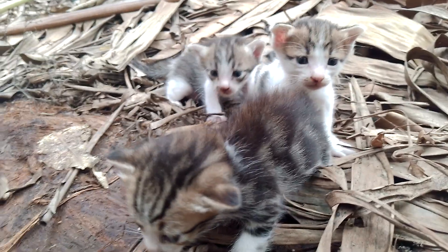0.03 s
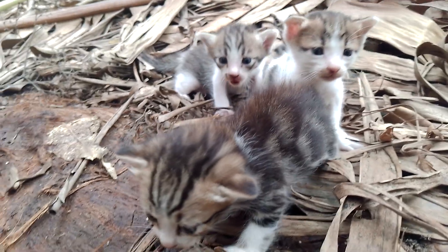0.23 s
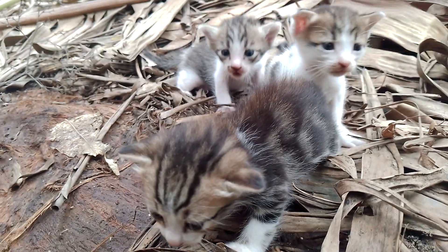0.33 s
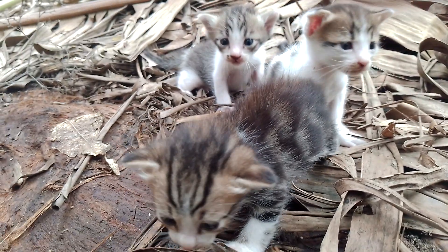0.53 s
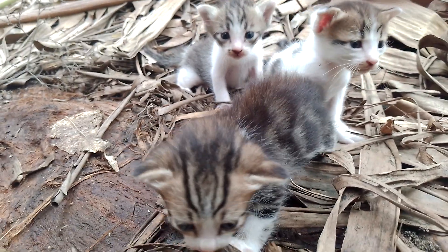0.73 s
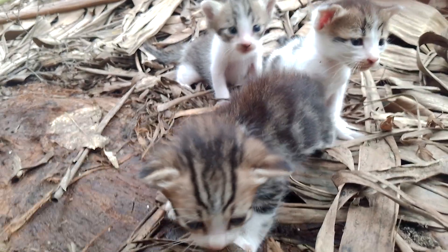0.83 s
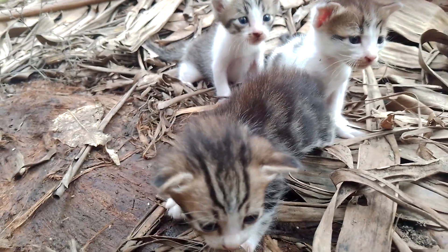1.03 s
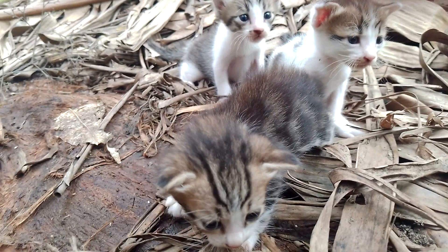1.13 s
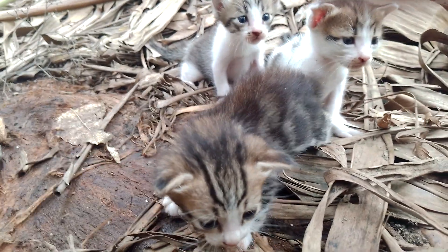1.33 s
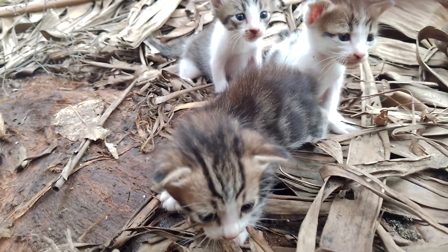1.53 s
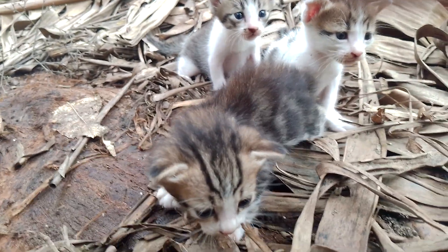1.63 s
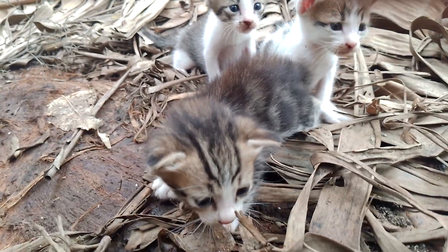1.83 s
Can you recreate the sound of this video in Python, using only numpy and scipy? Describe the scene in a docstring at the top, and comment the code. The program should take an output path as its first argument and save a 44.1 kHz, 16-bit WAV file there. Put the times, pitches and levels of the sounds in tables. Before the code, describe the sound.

A kitten hisses briefly after a few crisp crackles of dry leaves, close up outdoors.

```python
"""Light paw ticks and short runs of snaps from brittle leaves, outdoors, close to the microphone.
Kittens are shifting about on dry litter: each snap is a spray of breaking fibres that sets a leaf
ringing or quivering, twigs knock and fur brushes past. Then one kitten gives a thin hiss of half a
second, air rushing and whistling through its narrowing mouth. Behind it all lies very quiet air with
a few faint chirps far off."""
import sys
import numpy as np
from scipy import signal
from scipy.fft import rfft, irfft
from scipy.io import wavfile

SR = 44100
rng = np.random.default_rng(int(sys.argv[2]) if len(sys.argv) > 2 else 0)


def put_to_file(sound):
    """Save the sound as 16-bit audio at rate SR, in the file named by the first command-line argument."""
    columns = np.atleast_2d(sound).T  # one column per channel
    safe = np.clip(columns, -1, 1)
    whole_steps = np.round(safe * 32767)
    wavfile.write(sys.argv[1], SR, whole_steps.astype(np.int16))


N = 83790
TIME = np.arange(N) / SR

# Leaves snapping by the microphone. Each row: start in seconds, strength in dB, decay in seconds, leaf.
LEAF_SNAPS = [(0.2444, 0.5, 0.00015, "papery"), (0.2546, 0, 0.0015, "papery"), (.258, 1, 0.0013, "papery"),
              (0.2449, -11, 0.0037, "crisp"), (0.2493, -1.5, 0.0038, "crisp"),
              (.2526, 0.5, 0.00098, "crisp"), (0.2569, 1.5, 0.0015, "crisp"),
              (0.38, 6.5, 0.0022, "ringing"), (0.383, 3.5, 0.0012, "ringing"),
              (0.6188, -1.5, 0.0041, "hollow"), (0.6203, -0.5, 0.0034, "hollow"),
              (0.6231, 1.5, 0.0017, "hollow"), (0.6259, 0, 0.0028, "hollow"), (.9848, -3, 0.001, "stiff"),
              (0.9878, -1, 0.01, "stiff"), (0.9958, -10, 0.0011, "stiff"), (0.9976, -7.5, 0.0065, "stiff"),
              (0.584, -17, 0.00099, "small"), (1.025, -25, 0.0028, "small"), (1.056, -8, 0.00092, "small"),
              (1.0607, -13, 0.00081, "small")]
# How a snap builds up. Each entry: leaf, rise time in seconds.
SNAP_RISE_S = {"papery": .0001, "crisp": .0001, "ringing": 0.00021, "hollow": 0.00018, "stiff": 0.000088,
               "small": 0.00069}
# The colour of each leaf. Each row: frequency in Hz, relative level in dB.
LEAF_COLOURS = {"papery": [(30, -28.5), (250, -19), (800, -23.5), (2100, -17), (3700, -20), (5300, -14),
                (6400, -18), (9000, -13), (11000, -6), (14000, -8), (16000, -2)], "crisp": [(1500, -30.5),
                (6000, -19), (7600, -4), (9000, -1), (10800, -8.5), (13000, -5), (16000, -1)],
                "ringing": [(300, -62), (624, -55.5), (1870, -32), (2360, -41.5), (3400, -19.5),
                (5080, -33.5), (6620, -13.5), (7200, -26), (7690, -4), (9240, 6.5), (10200, -21),
                (14000, -17), (16000, -21)], "hollow": [(120, -58.5), (270, -26.5), (480, -11.5),
                (800, -26), (1300, -19), (1950, -7), (2800, -18.5), (3400, -15), (5200, -29.5),
                (6000, -14.5), (8000, -15.5), (10200, 7.5), (11100, -18.5), (12300, -0.5), (14000, -2),
                (16000, -5.5)], "stiff": [(120, -64), (200, -48.5), (1230, -18), (1810, -14), (2910, -22.5),
                (3370, -17.5), (4770, -18.5), (5230, -31.5), (6760, -5.5), (7410, -9.5), (9060, -9),
                (10700, 2), (13600, -6), (16000, -6)], "small": [(1000, -55), (1800, -34), (3000, -42),
                (3900, -28), (5500, -32), (7800, -23.5), (8600, 3.5), (9600, -12.5), (10800, -0.5),
                (12400, -10), (13200, -12.5), (14500, -12.5), (16000, -20)]}
# The tones each leaf rings with. Each row: pitch in Hz, gain in dB, 60 dB decay time in seconds.
LEAF_RINGS = {"papery": [(14100, -24, .012)], "crisp": [], "ringing": [(3560, -50, .014), (4650, -51, .014),
              (7950, -40, .014), (8500, -40, .014), (9240, -33, .014)], "hollow": [(1970, -39, 0.019),
              (6120, -45, .025), (9300, -48, 0.016), (10300, -45, 0.037)], "stiff": [(1893, -33.5, 0.021),
              (7000, -36, 0.017), (15380, -23, .02)], "small": [(8450, -28, 0.0041)]}
# Each leaf's quiver. Each row: centre in Hz, width in Hz, gain in dB, 60 dB decay time in seconds.
LEAF_QUIVERS = {"papery": [], "crisp": [(8400, 1300, -33, 0.22)], "ringing": [(3560, 200, -49.5, 0.204),
                (7560, 170, -34, 0.15), (8300, 150, -35, 0.13), (8880, 190, -36, .15)],
                "hollow": [(445, 230, -40.5, 0.11), (2500, 1900, -37, 0.081), (5970, 220, -42.5, 0.38),
                (9150, 130, -36, .18), (10000, 450, -27.5, 0.25)], "stiff": [(1804, 85, -38.5, 0.36),
                (7140, 804, -25, 0.34)], "small": []}

# Light touches of the paws. Each row: start in seconds, strength in dB, centre in Hz.
PAW_TICKS = [(0.036, -37, 9600), (0.316, -37, 10000), (0.331, -37.5, 8300), (0.4704, -30, 8130),
             (0.513, -38, 10900), (0.575, -35.5, 11900), (0.832, -41, 9400), (0.904, -42.5, 9560),
             (0.94, -36, 8300), (1.045, -34, 10000), (1.184, -31.5, 15240), (1.218, -31.5, 9500),
             (1.801, -34, 9600), (1.848, -37, 10000)]
TICK_DECAY_S, TICK_Q = .0012, 9   # Q is centre over bandwidth
CRUMBS_DB, CRUMBS_SPREAD_S = -8.5, .003   # relative to their tick
# Twigs knocking. Each row: start in seconds, strength in dB, centre in Hz, width in Hz, decay in seconds.
TWIG_KNOCKS = [(0.4793, -39.5, 2780, 260, 0.0029), (.482, -44, 1960, 201.3, 0.0016),
               (.576, -45, 2500, 700, 0.0035), (1.19, -39.5, 1061, 598, 0.0018),
               (1.797, -45.5, 757, 510, 0.011), (1.802, -45, 2615, 700, .002),
               (1.861, -44, 2520, 2010, 0.0016)]
SETTLE_PER_S, SETTLE_HZ = 51, 10000
# Fur brushing the litter. Each row: time in seconds, level in dB.
FUR_LEVEL = [(1.0, -54.5), (1.1, -85), (1.14, -69), (1.22, -69), (1.33, -63), (1.4, -108)]
# The colour of that brushing. Each row: frequency in Hz, relative level in dB.
FUR_COLOUR = [(300, -13), (900, -8.5), (1500, -2.5), (2600, -8.5), (5000, -9), (9000, -5)]

# The air flow of the hiss. Each row: time in seconds, level in dB.
BREATH_LEVEL = [(1.2, -88), (1.225, -54.5), (1.25, -47), (1.28, -48), (1.35, -42.5), (1.385, -42.5),
                (1.43, -46), (1.55, -46), (1.6, -47), (1.668, -48), (1.685, -60), (1.71, -86)]
# The colour of the breath. Each row: frequency in Hz, relative level in dB.
BREATH_COLOUR = [(150, -50), (440, -18), (750, -32), (1400, -27), (2100, -18), (2700, -17.5), (3500, -13),
                 (4900, -16.5), (5400, -9.5), (6700, -14.5), (8800, 2.5), (10400, 3), (12000, -32),
                 (16000, -22)]
# The treble on top of the breath. Each row: time in seconds, level in dB.
TREBLE_LEVEL = [(1.2, -121), (1.244, -48), (1.256, -48), (1.292, -55.5), (1.354, -53.5), (1.38, -44),
                (1.426, -51.5), (1.608, -43), (1.666, -42), (1.71, -100)]
# The colour of that treble. Each row: frequency in Hz, relative level in dB.
TREBLE_COLOUR = [(7000, -31), (9800, -29), (11000, 1), (14000, -3.5), (15300, -1.5), (16000, -16)]
# Antiresonances of the mouth. Each row: centre in Hz, width in Hz.
MOUTH_NOTCHES = [(1690, 190), (3970, 63), (5020, 240), (5760, 250)]
# High resonances of the mouth. Each row: nominal pitch in Hz, width in Hz, relative level in dB.
HIGH_WHISTLES = [(7540, 160, -5), (9370, 194, 7), (10960, 130, -4.5), (11380, 110, -8.5)]
# Those resonances sounding as the mouth narrows. Each row: time in seconds, level in dB.
HIGH_WHISTLE_LEVEL = [(1.2, -88.5), (1.25, -58), (1.29, -46.5), (1.35, -64), (1.38, -37), (1.398, -33),
                      (1.43, -43), (1.52, -37.5), (1.56, -48.5), (1.65, -44), (1.70, -96)]
# The lowest mouth resonance. Each row: time in seconds, level in dB.
LOW_WHISTLE_LEVEL = [(1.35, -69), (1.41, -54.5), (1.445, -56.5), (1.52, -52.5), (1.56, -63), (1.59, -53.5),
                     (1.662, -63), (1.69, -69)]
# The resonances rising as the mouth narrows. Each row: time in seconds, share of nominal pitch.
WHISTLE_RISE = [(1.29, 0.9), (1.39, 0.99), (1.52, 1.0), (1.63, 1.012)]
LOW_WHISTLE_HZ, LOW_WHISTLE_WIDTH_HZ = 4418, 230   # nominal pitch
THROAT_HZ, THROAT_WIDTH_HZ, THROAT_DB = 2014, 174, -23   # nominal pitch; level relative to the breath
TREMBLE_SHARE, TREMBLE_HZ = .004, 24.3   # the whistles waver in pitch
FLUTTER_DB, FLUTTER_HZ = .6, 98   # the whole hiss flutters in level
RIPPLE_DB, RIPPLE_SPACING_HZ = 7, 171

# Scatter from the plants around. Each row: frequency in Hz, relative level in dB.
SCATTER_COLOUR = [(150, -3.5), (2000, -5), (4500, -8), (7500, -4), (10000, -7.5), (13000, -2.5),
                  (16000, -1.5)]
SCATTER_DB, SCATTER_T60_S = -25, .2
# Chirps far off. Each row: start in seconds, length in seconds, centre in Hz, top level in dB.
FAR_CHIRPS = [(0.127, 0.078, 7320, -63.5), (0.506, 0.049, 3880, -75), (0.677, 0.061, 7370, -62.5),
              (0.707, 0.1, 7700, -71.5)]
CHIRP_Q = 11
# The still outdoor air. Each row: frequency in Hz, relative level in dB.
AIR_COLOUR = [(25, -15), (50, -14.5), (100, -6), (175, -14.5), (280, -2), (700, -14.5), (2400, -17.5),
              (3100, -12.5), (5300, -15.5), (9000, -3.5), (12000, -9.5), (16000, -6.5)]
AIR_DB = -68.5
CUTOFF_HZ = 15750


def leaves():
    """Right by the microphone, each leaf gives way in a few snaps that leave it ringing or quivering."""
    out = np.zeros(N)
    for name, spectrum in LEAF_COLOURS.items():
        force = np.zeros(N)
        for start, db, decay_s, leaf in LEAF_SNAPS:
            if leaf == name:
                add(force, start, db, fracture(decay_s, SNAP_RISE_S[name]))
        out += colour(force, spectrum)
        out += sum(from_db(db) * ring(force, hz, t60) for hz, db, t60 in LEAF_RINGS[name])
        out += sum(linger(force, band(hz, width), db, t60) for hz, width, db, t60 in LEAF_QUIVERS[name])
    return out


def fracture(decay_s, rise_s, size=2048):
    """A swelling, then dying spray of tiny fibre breaks."""
    t = TIME[:size]
    fade = np.exp(-t / decay_s) * (1 - np.exp(-t / rise_s)) ** 2
    spray = rng.standard_normal(size) * from_db(2.3 * rng.standard_normal(size)) * fade
    for _ in range(2):   # flatten the spectrum while keeping the burst short
        spray = irfft(np.exp(1j * np.angle(rfft(spray * np.sqrt(fade)))))
    return spray * np.exp(-t / (5 * decay_s)) * np.linspace(1, 0, size) ** 2


def paws():
    """Each touch of a paw ticks on the litter and breaks two crumbs around it."""
    out = np.zeros(N)
    for start, db, hz in PAW_TICKS:
        add(out, start, db, resonate(fracture(TICK_DECAY_S, rise_s=.00036), hz, hz / TICK_Q))
        for lag in rng.uniform(-CRUMBS_SPREAD_S, CRUMBS_SPREAD_S, size=2):
            crumb = resonate(fracture(TICK_DECAY_S, rise_s=.0001), hz, hz / 2)
            add(out, start + lag, db + CRUMBS_DB, crumb)
    return out


def hiss():
    """Close up, fluttering air rushes through throat and teeth, and the narrowing mouth whistles."""
    flow = level(BREATH_LEVEL)
    rush = flow * noise(BREATH_COLOUR) + ripple(level(TREBLE_LEVEL) * noise(TREBLE_COLOUR))
    for hz, width in MOUTH_NOTCHES:
        rush -= resonate(rush, hz, width)
    throat = flow * from_db(THROAT_DB) * whistle(THROAT_HZ, THROAT_WIDTH_HZ)
    high_bands = sum(from_db(db) * whistle(hz, width) for hz, width, db in HIGH_WHISTLES)
    high = level(HIGH_WHISTLE_LEVEL) * rms_one(high_bands)
    low = level(LOW_WHISTLE_LEVEL) * whistle(LOW_WHISTLE_HZ, LOW_WHISTLE_WIDTH_HZ)
    flutter = from_db(FLUTTER_DB * wander(FLUTTER_HZ))
    return flutter * (rush + throat + high + low)


def whistle(hz, width_hz):
    """A resonance of mouth or throat: a narrow band of noise that trembles and rises in pitch."""
    rise = np.interp(TIME, *np.transpose(WHISTLE_RISE))
    tremble = 1 + TREMBLE_SHARE * wander(TREMBLE_HZ)
    phase = 2 * np.pi * np.cumsum(hz * rise * tremble) / SR
    return rms_one(sum(wander(width_hz / 2) * wave(phase) for wave in (np.cos, np.sin)))


def ripple(x):
    """Small irregular resonances put steady peaks and dips into the spectrum."""
    hz = np.fft.rfftfreq(N, 1 / SR)
    bumps = np.interp(hz / RIPPLE_SPACING_HZ, np.arange(N), rng.uniform(-1, 1.01, N))
    return irfft(rfft(x) * from_db(RIPPLE_DB * bumps), N)


def twigs():
    """Twigs knock together, each knock a short burst through one resonance."""
    out = np.zeros(N)
    for start, db, hz, width, decay_s in TWIG_KNOCKS:
        add(out, start, db, resonate(fracture(decay_s, rise_s=.00019), hz, width))
    return out


def fur():
    """Fur slides over the litter in soft swells of noise."""
    return level(FUR_LEVEL) * noise(FUR_COLOUR)


def settling():
    """The litter keeps settling with tiny, high ticks at random moments."""
    slips = rng.random(N) < SETTLE_PER_S / SR
    strength = from_db(-39.5 + 1.4 * np.minimum(rng.exponential(1, N), 3))
    return resonate(slips * strength, SETTLE_HZ, SETTLE_HZ / TICK_Q)


def plant_scatter(x):
    """The plants around throw a weak, short tail back to the microphone."""
    return linger(x, noise(SCATTER_COLOUR), SCATTER_DB, SCATTER_T60_S)


def far_chirps():
    """Far from the microphone, blurred chirps: each one a swell of narrow noise."""
    out = np.zeros(N)
    for start, length, hz, db in FAR_CHIRPS:
        swell = np.sin(np.pi * np.clip((TIME - start) / length, 0, 1))
        out += from_db(db) * swell * band(hz, hz / CHIRP_Q)
    return out


def still_air():
    """The quiet of the place: a faint, steady bed of noise."""
    return from_db(AIR_DB) * noise(AIR_COLOUR)


def from_db(db):
    """Decibels to gain."""
    return 10 ** (np.asarray(db) / 20)


def rms_one(x):
    """Scale to unit rms."""
    return x / np.sqrt(np.mean(x ** 2) + 1e-20)


def level(rows):
    """Gain from a curve of seconds and dB, silent outside it."""
    return from_db(np.interp(TIME, *np.transpose(rows), left=-150, right=-150))


def add(track, start_s, db, burst):
    """Lay a burst into a track with its energy set in dB."""
    i = int(start_s * SR)
    track[i:i + len(burst)] += (from_db(db) * burst / np.linalg.norm(burst))[:N - i]


def colour(x, points, size=4096):
    """Causal filter of unit energy, shaped by points of Hz and dB."""
    hz, db = np.transpose(points)
    grid = np.maximum(np.fft.rfftfreq(size, 1 / SR), 1)
    gain = from_db(np.interp(np.log(grid), np.log(hz), db))
    cepstrum = irfft(np.log(gain))
    cepstrum[1:size // 2] *= 2   # fold to minimum phase
    cepstrum[size // 2 + 1:] = 0
    response = irfft(np.exp(rfft(cepstrum)))
    return signal.fftconvolve(x, response / np.linalg.norm(response))[:N]


def resonate(x, hz, width_hz):
    """Two-pole resonance, gain 1 at its peak."""
    r = np.exp(-np.pi * width_hz / SR)
    feedback = [1, -2 * r * np.cos(2 * np.pi * hz / SR), r * r]
    return signal.lfilter(np.array([1, 0, -1]) * (1 - r * r) / 2, feedback, x)


def ring(x, hz, t60):
    """A unit click sets a tone of height 1 ringing."""
    r = from_db(-60 / (t60 * SR))
    feedback = [1, -2 * r * np.cos(2 * np.pi * hz / SR), r * r]
    return signal.lfilter([.5, 0, -.5], feedback, x + 1e-18)


def linger(x, tail_noise, db, t60):
    """Smear a sound into a dying tail of the given noise."""
    tail = tail_noise * from_db(-60 * TIME / t60)
    return from_db(db) * signal.fftconvolve(x, tail / np.linalg.norm(tail))[:N]


def noise(points):
    """Coloured noise of unit rms."""
    return rms_one(colour(rng.standard_normal(N), points))


def band(hz, width_hz):
    """Noise in one steep-sided resonance, unit rms."""
    return rms_one(resonate(resonate(rng.standard_normal(N), hz, width_hz), hz, 4 * width_hz))


def wander(hz):
    """Random drift of unit rms, mostly slower than the given rate."""
    return rms_one(signal.sosfilt(signal.butter(2, hz, fs=SR, output="sos"), rng.standard_normal(N)))


def scene():
    """One microphone close to the kittens on the litter, with plants around and chirps far off."""
    litter = leaves() + paws() + twigs() + settling() + fur()
    return (litter + plant_scatter(litter) + hiss() + far_chirps() + still_air())[None]


def record(dry):
    """A steep low-pass takes the very top off the microphone signal."""
    return signal.sosfilt(signal.ellip(10, .2, 70, CUTOFF_HZ, fs=SR, output="sos"), dry)


dry = scene()
out = record(dry)
put_to_file(out)
```